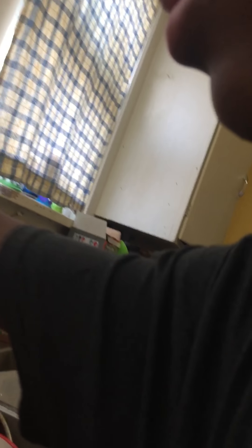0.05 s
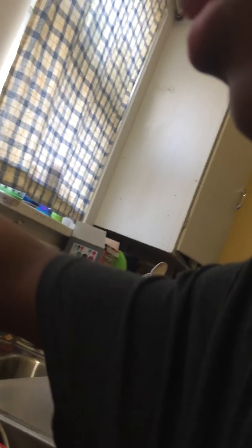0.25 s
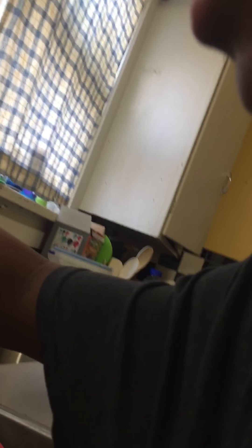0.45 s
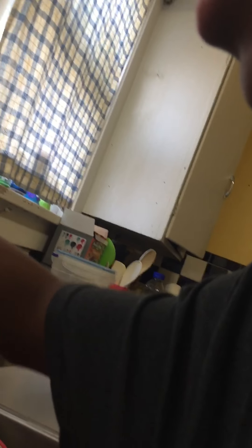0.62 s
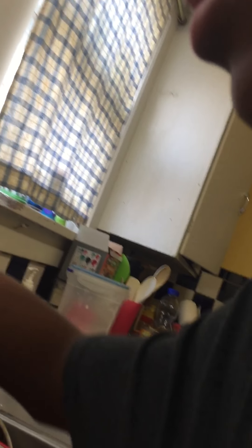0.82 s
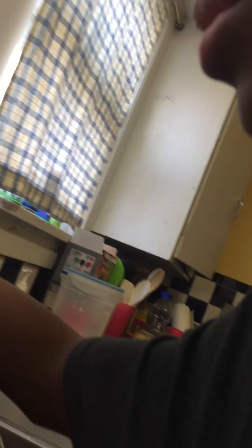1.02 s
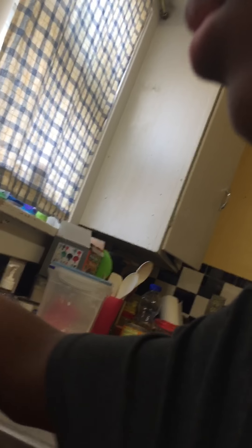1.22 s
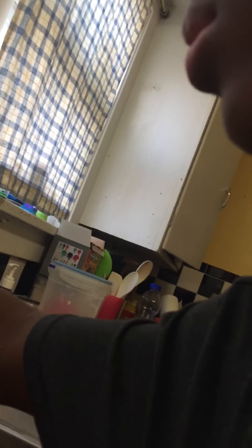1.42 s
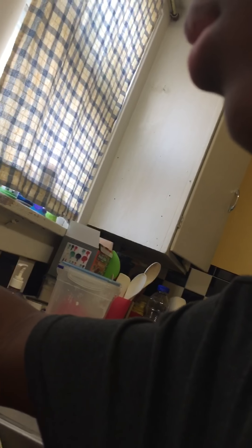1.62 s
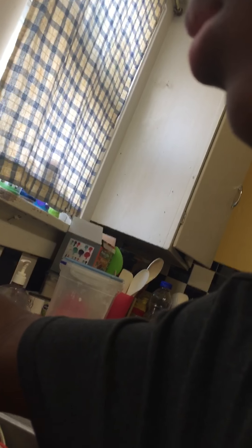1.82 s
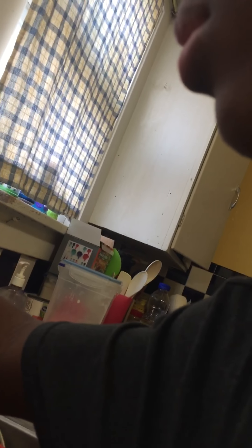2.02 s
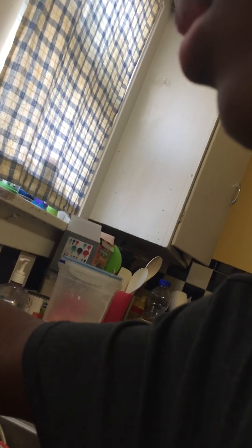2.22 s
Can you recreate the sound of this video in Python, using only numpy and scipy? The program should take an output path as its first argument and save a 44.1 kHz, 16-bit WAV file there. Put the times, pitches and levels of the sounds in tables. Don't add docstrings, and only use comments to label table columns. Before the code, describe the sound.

Metal pot drops with a loud ringing clang and quick rattle in a steel sink, gets shifted softly, then dishes knock dully on the basin with small cutlery clinks; small hard kitchen, close phone microphone.

```python
import sys
import numpy as np
from scipy import signal
from scipy.fft import rfft, irfft
from scipy.io import wavfile
from scipy.ndimage import uniform_filter1d, map_coordinates

SR = 44100
rng = np.random.default_rng(int(sys.argv[2]) if len(sys.argv) > 2 else 0)


def log_audio(samples):
    frames = np.atleast_2d(samples).T
    limited = np.clip(frames, -1, 1)
    pcm = np.round(limited * 32767).astype(np.int16)
    wavfile.write(sys.argv[1], SR, pcm)


def volts(x):
    e = np.asarray(x, float) / 20
    return 10 ** e


N = 101430
TOP_HZ = 15750
PEAKY_DB = 3.5


def unit(x):
    return x / np.sqrt(np.mean(x ** 2) + 1e-20)


def along(points, hz):
    f, v = np.transpose(points)
    return np.interp(np.log(hz + 1), np.log(f + 1), v)


def wobble(rate_hz):
    knots = rng.standard_normal(int(N * rate_hz / SR) + 4)
    return map_coordinates(knots, [np.arange(N) * rate_hz / SR])


def coloured(spectrum):
    white = rfft(rng.standard_normal(N))
    return unit(irfft(white * volts(along(spectrum, np.fft.rfftfreq(N, 1 / SR))), N))


def swells(rows):
    t = np.arange(N) / SR
    out = np.zeros(N)
    for start_s, length_s, level_db in rows:
        progress = np.clip((t - start_s) / length_s, 0, 1)
        out += volts(level_db) * np.sqrt(np.abs(np.sin(np.pi * progress)))
    return out


def dying(dies, spectrum, rings, peaky_db):
    uneven = 0.3
    hz, t, z = signal.stft(rng.standard_normal(SR // 2), SR, nperseg=256)
    luck = rng.standard_normal((2, len(hz))) * peaky_db
    life = np.exp(uneven * np.tanh(luck[1] / PEAKY_DB))
    t60_s = np.clip(rings * along(dies, hz) * life, 0.003, 2)
    level_db = (along(spectrum, hz) + luck[0])[:, None] - 60 * t / t60_s[:, None]
    tail = signal.istft(z * volts(level_db), SR, nperseg=256)[1][:SR // 2]
    return tail / np.linalg.norm(tail)


def struck(hits, modes, noise, dies, noise_db, rings, detune=0):
    longest_t60_s, scatter_db = 0.32, 3
    crack_db, crack_s = -5, 0.005
    rattle_db, rattle_rises = -3, 7
    pivot_hz = 987
    size = SR // 2
    out = np.zeros(N + SR)
    t = np.arange(size) / SR
    f = np.fft.rfftfreq(SR, 1 / SR)
    hz, db, t60_s = np.transpose(modes)[:, :, None]
    t60_s = rings * np.minimum(t60_s, longest_t60_s)
    for start_s, peak_db, rise_s, hard_db in hits:
        swell = (1 - np.exp(-t / max(rise_s, 1e-4))) ** 2
        pitch_hz = hz * (1 + detune * rng.standard_normal())
        delays_s = rattle_rises * rise_s * rng.random((3, 1))
        rattle = 1 + volts(rattle_db) * np.exp(-2j * np.pi * f * delays_s).sum(axis=0)

        mode_db = db + scatter_db * rng.standard_normal(db.shape) - 60 * t / t60_s
        ring = np.sum(volts(mode_db) * np.sin(2 * np.pi * pitch_hz * t), axis=0)
        plate = volts(noise_db) * dying(dies, noise, rings, PEAKY_DB)
        burst = rng.standard_normal(size) * volts(-60 * t / (crack_s + rise_s))
        crack = irfft(rfft(burst, SR) * volts(along(noise, f)), SR)[:size] * swell
        crack = volts(crack_db) * crack / np.linalg.norm(crack)

        tonal = rfft(ring * swell, SR) / np.linalg.norm(ring)
        rough = rfft(plate * swell + crack, SR) * rattle / 2
        hardness = (1 + 1j * f / pivot_hz) ** (hard_db / 6)
        sound = irfft((tonal + rough) * hardness, SR)[:size]
        loudest = np.sqrt(2 * uniform_filter1d(sound ** 2, size=200).max())
        out[round(start_s * SR):][:size] += volts(peak_db) * sound / loudest
    return out[:N]


def pot():
    # start_s, peak_db, rise_s, hardness_db_per_octave
    hits = [
        (0.0, -26, 0.003, -3),
        (0.209, -30, 0.011, -12),
        (0.2395, 3, 0.0009, -0.5),
        (0.250, -7.5, 0.0019, -4),
        (0.264, -6.5, 0.0061, 2),
        (0.279, -15.5, .002, 2.5),
        (0.426, -23.5, 0.001875, 0),
        (0.444, -16.5, 0.0013, -14),
        (0.479, -23, 0.0012, -12),
        (0.535, -42, 0.0027, 3),
    ]
    shifts = [
        (0.093, -37.5, 0.0038, -16),
        (0.635, -26.5, 0.0044, -13.5),
        (0.707, -33.5, 0.0037, -4.5),
        (0.726, -40.5, 0.0031, -5.5),
        (0.813, -35, 0.0033, -5),
        (0.874, -43.5, 0.0037, -6.5),
        (0.939, -45.5, 0.0037, -8.5),
    ]
    # hz, level_db, t60_s
    modes = [(244, -3.5, 0.37), (324, -0.5, .33), (408.5, -3, 0.24), (480, 4.5, 0.11), (520, 5, 0.16),
             (692.8, -3.5, .3), (997, -8.5, 0.24), (1023, -4.5, 0.26), (1345, -12, .4), (1751, -6, 0.228),
             (1924, 0.5, .15), (2615, -6, .25), (2880, -13, .2), (3560, -12.5, 0.36)]
    # hz, db_per_hz
    free_noise = [(170, -52), (260, -9.5), (600, -8), (1500, -14.5), (4600, -21.5), (5200, -30),
                  (16000, -45)]
    held_noise = [(180, -3.5), (500, -6), (1200, -25), (8000, -26)]
    # hz, t60_s
    free_dies = [(200, 0.47), (1000, 0.5), (12000, 0.66)]
    held_dies = [(300, 0.58), (2000, 0.55)]
    landing = struck(hits, modes, free_noise, free_dies, noise_db=-5.5, rings=0.73)
    shifting = struck(shifts, modes, held_noise, held_dies, noise_db=5.5, rings=0.58)
    return volts(-9) * landing + volts(-7) * shifting


def basin():
    # start_s, peak_db, rise_s, hardness_db_per_octave
    hits = [(0.988, -38, 0.0012, -17), (1.138, -32.5, 0.0017, 2), (1.158, -25, 0.006, -13),
            (1.179, -33.5, 0.00223, -11.5), (1.251, -28.5, 0.0051, -4.5), (1.301, -18.5, 0.0023, -2),
            (1.352, -56, 0.0031, -5), (1.398, -37.5, 0.0033, -11), (1.446, -27.5, 0.0014, 0),
            (1.496, -39.5, 0.002, -5.5), (1.574, -35, 0.0076, -3), (1.620, -31, 0.008, -3),
            (1.645, -34.5, 0.00194, -9.5), (1.676, -45, 0.003, -9), (1.695, -40, 0.0026, -4),
            (1.745, -37, 0.0033, 1.5), (1.799, -43, 0.0083, 2), (1.864, -34, 0.0025, 3),
            (1.874, -28, 0.0046, -4), (1.9385, -20.5, 0.003, -1), (1.9645, -16, 0.001, 2),
            (1.987, -26.5, 0.0015, -0.5), (2.027, -29.5, 0.0058, 6.5), (2.137, -38.5, 0.0058, -13.5),
            (2.203, -45, 0.0014, 7), (2.212, -33, 0.0049, -2.5), (2.269, -46, 0.0033, -11.5)]
    # hz, level_db, t60_s
    modes = [(251.5, -6.5, 0.15), (328.5, -11.5, 0.23), (524.7, -4, 0.11), (632, 12.5, 0.041),
             (850, -3, 0.087), (1359, -12, 0.13), (1697, -7, 0.093), (2960, -13.5, 0.052),
             (5600, -18.5, 0.077)]
    # hz, db_per_hz
    noise = [(60, 4), (250, 5.5), (650, 4), (1400, -6), (4400, -21), (16000, -41)]
    # hz, t60_s
    dies = [(200, 0.12), (1500, 0.13), (12000, 0.0383)]
    return volts(-4) * struck(hits, modes, noise, dies, noise_db=-4.5, rings=0.67)


def cutlery():
    # start_s, peak_db, hardness_db_per_octave
    ticks = [(0.2109, -39.5, 4.5), (0.2657, -11, -3.5), (0.3362, -13, -6), (0.4192, -36.5, -3),
             (0.443, -30, -12), (0.4771, -27, -9.5), (0.9861, -54, -4), (1.1443, -37, -1),
             (1.1584, -33, -5), (1.263, -32, -3), (1.302, -28, -7), (1.4471, -37.5, -9),
             (1.5863, -36.5, -9), (1.6301, -37, -5), (1.7564, -92, -18), (1.8148, -56, -2.5),
             (1.8668, -45, -21), (1.9489, -39, 9), (1.9643, -28.5, -9), (2.0278, -36, 6),
             (2.1395, -50.5, 4)]
    # hz, level_db, t60_s
    modes = [(5500, 5.5, .12), (6790, 13, 0.16), (8350, 12, 0.15), (12300, 2.5, 0.096), (12500, -10.5, .12),
             (15300, 2, .1)]
    # hz, db_per_hz
    noise = [(1200, -19.5), (2500, -6), (6000, -12), (16000, -22.5)]
    # hz, t60_s
    dies = [(3000, 0.09), (15000, 0.097)]
    rise_s = 0.00037
    hits = [(start_s, peak_db, rise_s, hard_db) for start_s, peak_db, hard_db in ticks]
    return volts(-5.5) * struck(hits, modes, noise, dies, noise_db=12.5, rings=1, detune=0.04)


def clinks():
    # start_s, peak_db, centre_hz, t60_s
    contacts = [(.2482, -18, 3400, 0.034), (0.2536, -14, 2490, 0.047), (0.2621, -15, 4000, 0.018),
                (.268, -17, 7000, 0.053), (0.2763, -14.5, 2520, .03), (0.3006, -23, 2630, 0.034),
                (0.3359, -11, 3987, 0.0061), (0.4191, -30, 10070, 0.011), (0.4428, -28, 4360, .015),
                (0.4723, -42, 7100, 0.0064), (0.481, -32, 3890, 0.024), (.637, -35.5, 520, 0.085),
                (0.71, -35.5, 520, 0.1), (.7175, -44, 520, 0.024), (0.727, -31.5, 480, 0.052),
                (.811, -43.5, 550, 0.087), (.862, -49, 2010, 0.049), (.872, -46, 410, 0.072),
                (1.1586, -32, 3036, 0.035), (1.176, -38, 850, 0.035), (1.2683, -42, 4040, 0.017),
                (1.3017, -29, 2720, 0.024), (1.3557, -44, 2870, 0.026), (1.3992, -50, 3240, 0.055),
                (1.4333, -47, 2580, 0.037), (1.450, -34.5, 745, 0.027), (1.4532, -38.5, 2800, 0.015),
                (1.5008, -46, 3450, 0.041), (1.579, -52, 1730, 0.028), (1.589, -38.5, 2690, 0.0209),
                (1.6184, -44.5, 3040, 0.051), (1.631, -37, 3190, 0.021), (1.644, -37.5, 1420, 0.0636),
                (1.672, -44, 2770, 0.033), (1.875, -45.5, 754, 0.074), (1.952, -36, 4000, 0.039),
                (1.9647, -20, 2620, 0.023), (1.989, -36, 3740, 0.025), (2.0258, -34, 3460, 0.021),
                (2.037, -36, 1720, 0.03)]
    pitch_spread, rise_cycles = 0.22, 0.8
    out = np.zeros(N + SR)
    t = np.arange(SR // 8) / SR
    for start_s, peak_db, centre_hz, t60_s in contacts:
        luck = rng.standard_normal((2, 12, 1))
        spread = pitch_spread * np.clip(0.03 / t60_s, 0.2, 2)
        partial_hz = np.minimum(centre_hz * np.exp(spread * luck[0]), TOP_HZ)
        partials = volts(2.3 * luck[1] - 60 * t / t60_s) * np.sin(2 * np.pi * partial_hz * t)
        ring = partials.sum(axis=0) * (1 - np.exp(-t * centre_hz / rise_cycles))
        out[round(start_s * SR):][:len(t)] += volts(peak_db) * ring / np.abs(ring).max()
    return out[:N]


def long_rings():
    # start_s, peak_db, pitch_hz, t60_s
    notes = [(0.247, -8.5, 244, 0.15), (.241, -11.5, 997, 0.23), (.29, -27.5, 667, 0.37),
             (.325, -35, 324, 0.4), (.835, -51, 1700, 0.14), (1.172, -28, 250, 0.27),
             (1.255, -39, 253, 0.13), (1.301, -23, 249.7, .13), (1.871, -36, 248, .3),
             (1.967, -29, 1379, 0.14), (1.968, -29, 246.2, 0.24), (2.04, -40.5, 663.5, 0.22)]
    rise_cycles = 3
    start_s, peak_db, pitch_hz, t60_s = np.transpose(notes)[:, :, None]
    t = np.maximum(np.arange(N) / SR - start_s, 0)
    swing = volts(peak_db - 60 * t / t60_s) * (1 - np.exp(-t * pitch_hz / rise_cycles))
    return np.sum(swing * np.sin(2 * np.pi * pitch_hz * t), axis=0)


def scrapes():
    # start_s, length_s, level_db
    strokes = [
        (0.138, 0.33, -54.5),
        (0.521, 0.12, -54),
        (0.824, 0.091, -62),
        (1.317, 0.065, -67.5),
        (1.428, 0.073, -63.5),
        (1.6, 0.083, -62),
        (1.849, 0.19, -55.5),
    ]
    # hz, level_db
    tone = [(1000, -12.5), (1900, 7), (3600, 3), (7000, -21.5)]
    out = np.zeros(N)
    for stroke in strokes:
        grain = volts(3.9 * wobble(59.28) + 2.1 * wobble(600))
        grit = swells([stroke]) * grain * rng.standard_normal(N)
        body = dying([(100, 0.041)], tone, 0.84, PEAKY_DB / 2)
        out += signal.fftconvolve(grit, body)[:N]
    return out


def water():
    # start_s, length_s, level_db
    slops = [
        (1.3, .11, -69.5),
        (2.02, 0.3, -68.5),
    ]
    # hz, level_db
    tone = [(800, -17), (4000, 2.5), (16000, -5)]
    idle_db = -77.5
    grain = volts(1.5 * wobble(43) + 1.6 * wobble(400))
    return (swells(slops) + volts(idle_db)) * grain * coloured(tone)


def counter():
    # start_s, peak_db, pitch_hz
    thumps = [(0.0, -42, 82), (0.331, -36, 91.5), (0.377, -38.5, 96.5), (0.426, -38.5, 54.7),
              (0.479, -42, 105.5), (0.537, -50, 88), (0.657, -59, 60.6), (0.723, -43, 60.5),
              (0.988, -70, 72.5), (1.178, -38, 80), (1.318, -46, 77.5), (1.43, -41.5, 72.7),
              (1.54, -43, 51.1), (1.618, -46, 103), (1.769, -51.5, 109), (1.944, -32.5, 86),
              (2.038, -46, 80.5), (2.241, -45.5, 71.8)]
    # hz, level_db
    rumble_tone = [(30, -27.5), (60, 23.5), (120, 10), (180, -32)]
    hush_tone = [(59, -35), (100, 4.5), (2800, -14), (9210, -19.5), (16000, -33.5)]
    thump_db, rise_s, t60_s = 10, 0.0043, 0.15
    rumble_db, hush_db = -61.5, -67.5
    out = np.zeros(N + SR)
    t = np.arange(SR // 2) / SR
    swell = (1 - np.exp(-t / rise_s)) ** 2
    for start_s, peak_db, pitch_hz in thumps:
        level = volts(peak_db + thump_db - 60 * t / t60_s)
        out[round(start_s * SR):][:len(t)] += level * swell * np.sin(2 * np.pi * pitch_hz * t)
    rumble = volts(rumble_db + 1.4 * wobble(10)) * coloured(rumble_tone)
    return out[:N] + rumble + volts(hush_db) * coloured(hush_tone)


def kitchen(x):
    # hz, t60_s
    dies = [(500, 0.37), (12000, 0.39)]
    wall_s = 0.0056
    delayed = np.pad(x, (round(wall_s * SR), 0))
    return volts(-10.5) * signal.fftconvolve(delayed, dying(dies, [(100, 0)], 0.92, 0))[:N]


def scene():
    near = pot() + basin() + cutlery() + clinks() + long_rings() + scrapes()
    return (near + kitchen(near) + water() + counter())[None]


def band_limit(x):
    return signal.sosfilt(signal.butter(12, 16490, fs=SR, output="sos"), x)


def record(dry):
    low_hz = 50
    hz = np.fft.rfftfreq(N, 1 / SR)
    low_cut = (1j * hz / (low_hz + 1j * hz)) ** 3
    heard = irfft(rfft(dry) * (hz < TOP_HZ) * low_cut, N)
    return band_limit(heard)


dry = scene()
out = record(dry)
log_audio(out)
```